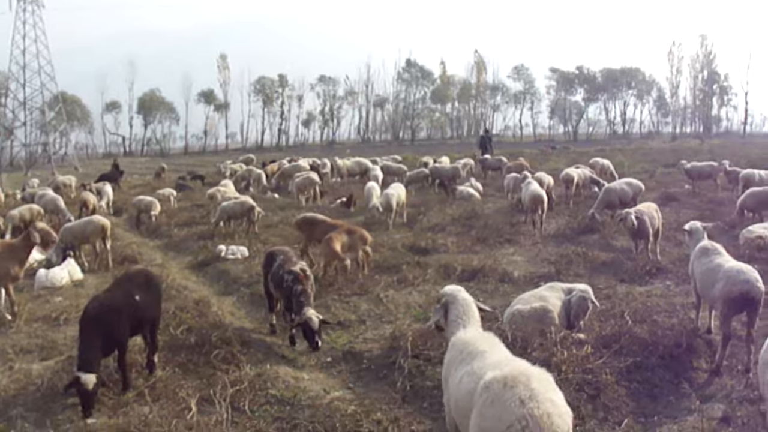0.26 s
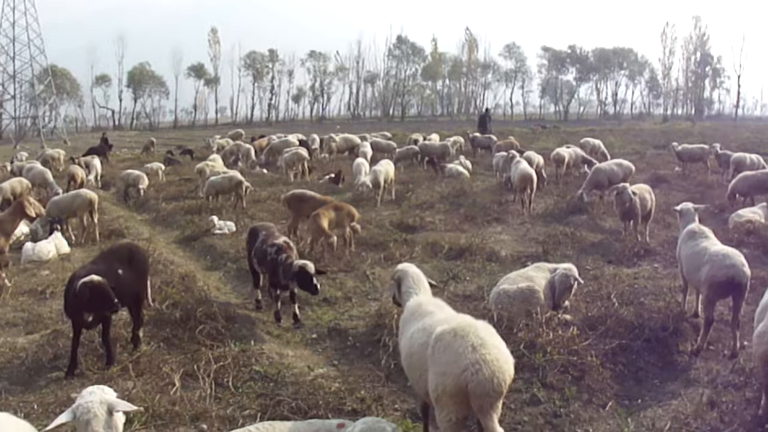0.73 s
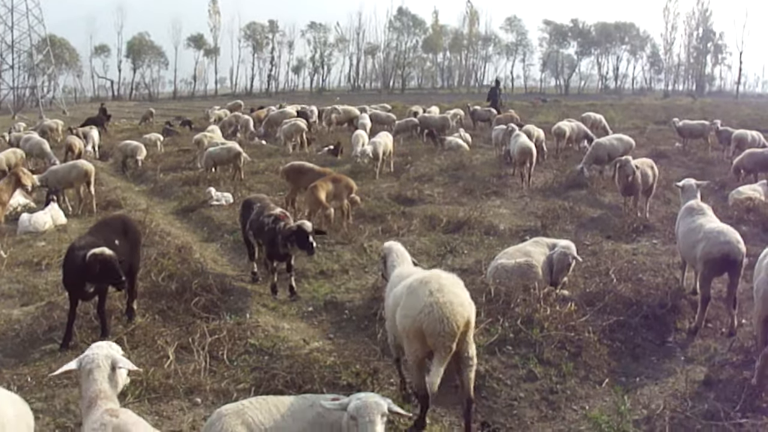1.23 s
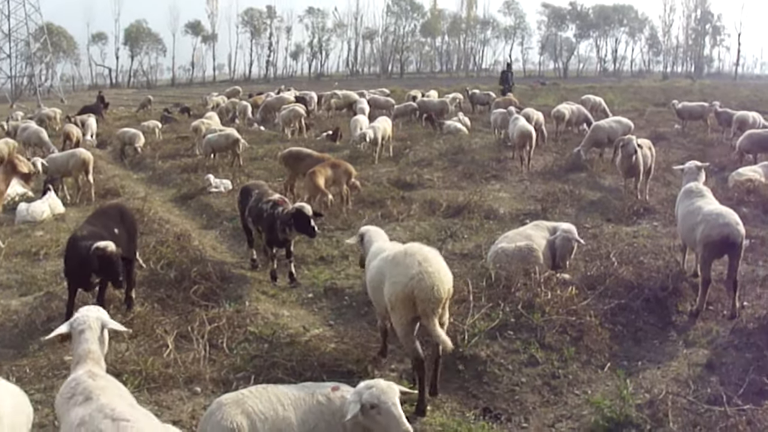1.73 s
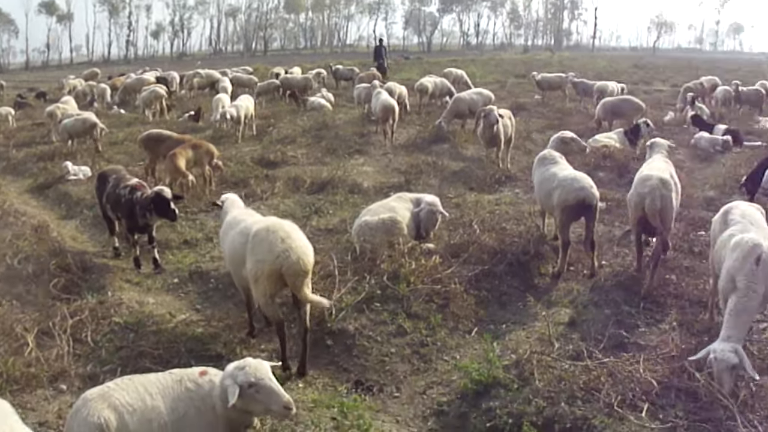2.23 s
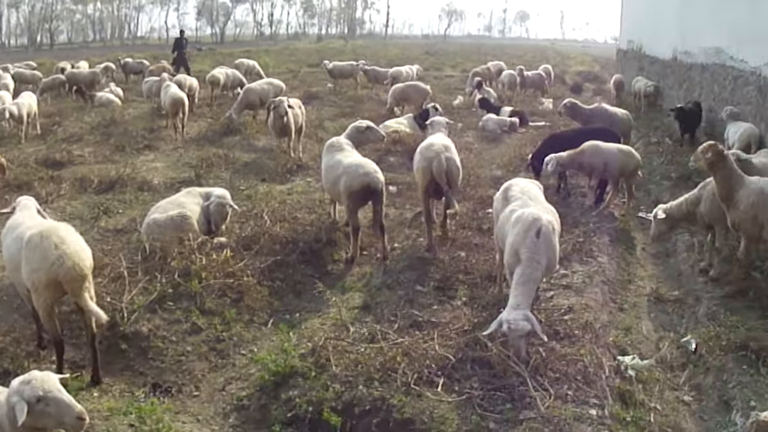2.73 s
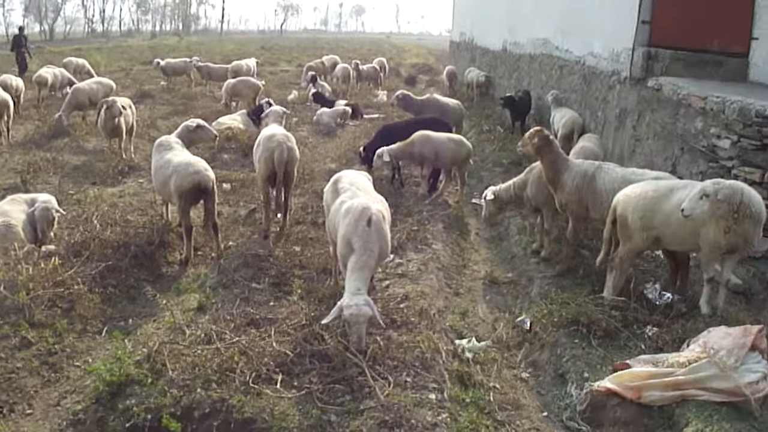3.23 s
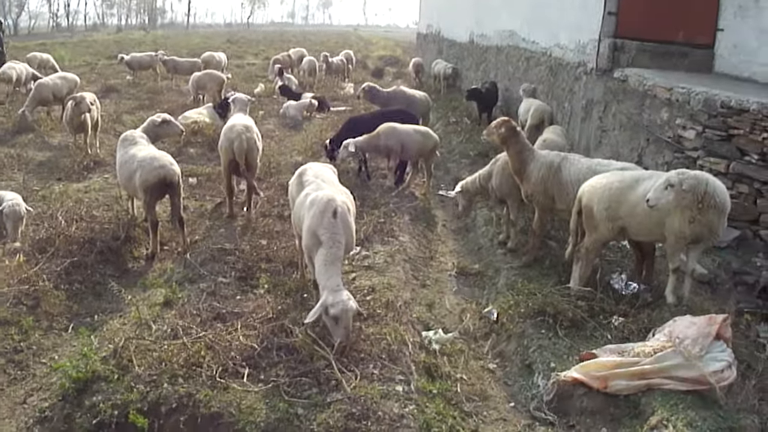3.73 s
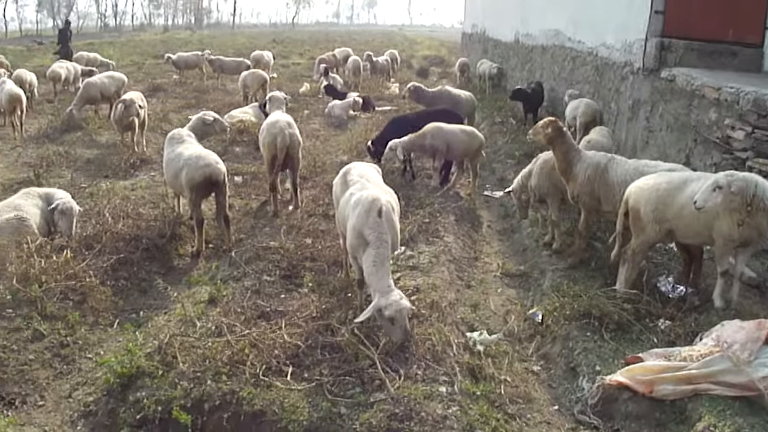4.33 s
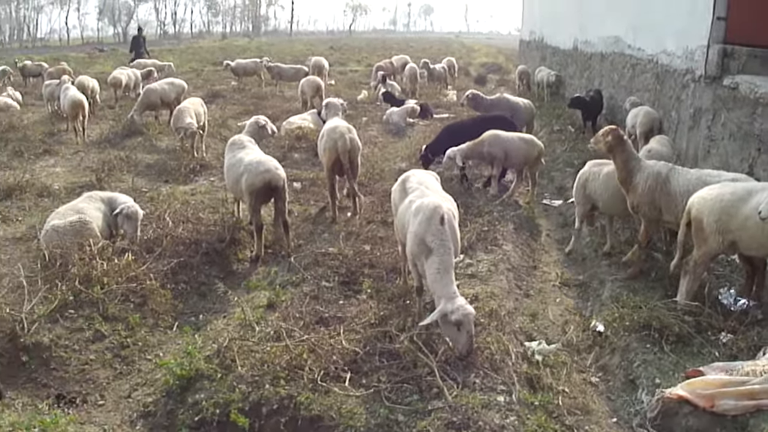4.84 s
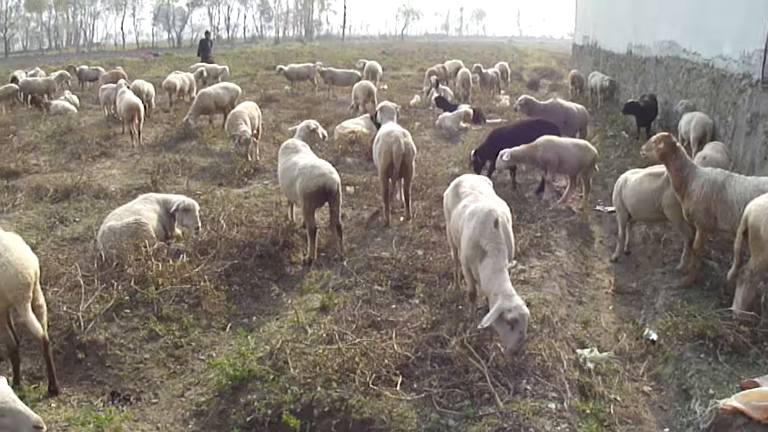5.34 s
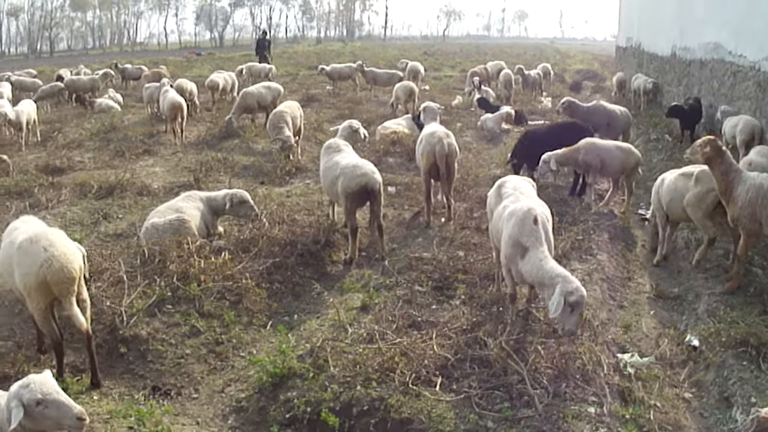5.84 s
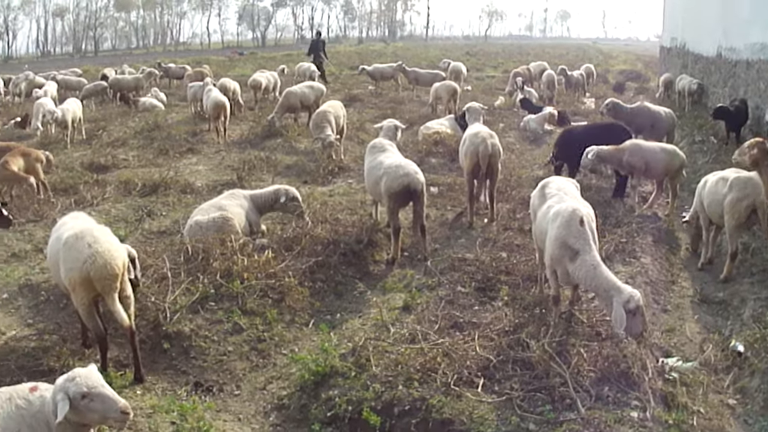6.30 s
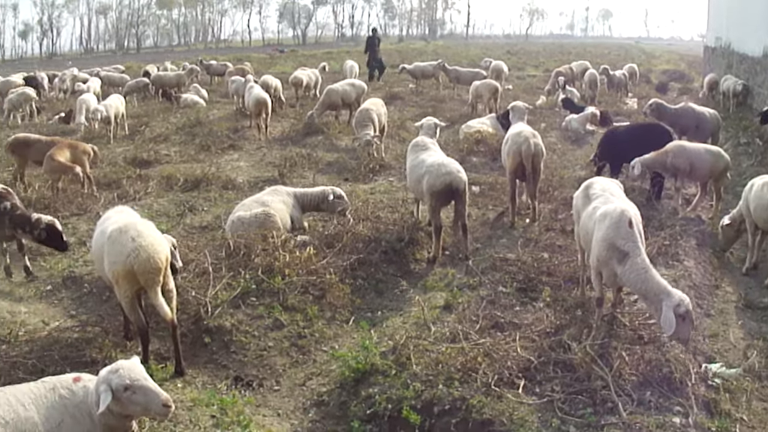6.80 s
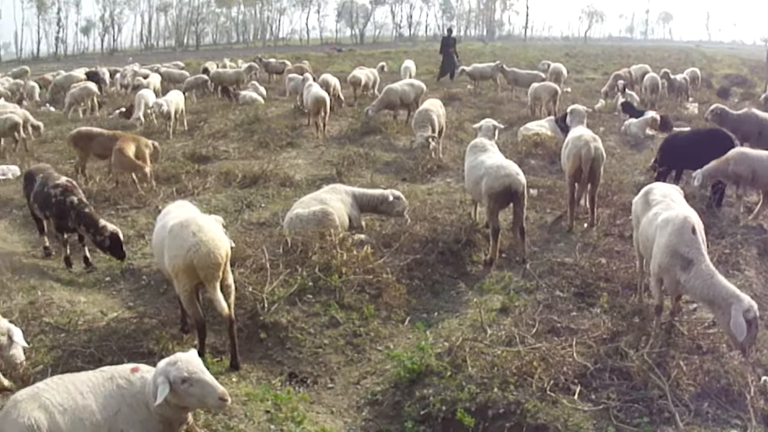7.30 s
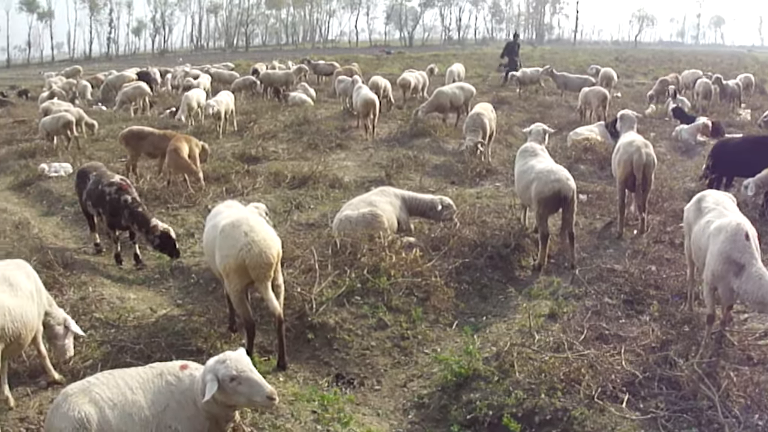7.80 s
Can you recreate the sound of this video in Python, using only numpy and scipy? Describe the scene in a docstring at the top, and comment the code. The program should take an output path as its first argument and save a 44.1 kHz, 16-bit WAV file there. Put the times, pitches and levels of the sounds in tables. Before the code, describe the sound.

Dry stalks rustle and snap in an open field while light wind puffs on the microphone. A sheep bleats loudly nearby, its note breaking into a rasp, and a faint, low bleat follows from far off. After a tiny tinkle of a bell comes a softer, hoarse bleat, then another loud one near the end. A distant engine thuds faintly under an even hush.

```python
"""Dry stalks rustle and snap in an open field; then sheep bleat: three near calls and a far, low one.
Each bleat follows the source-filter principle: closures of the vocal folds ring the vocal tract.
It starts creaky, holds a clean note and, when pushed, breaks into a rasp of uneven closures.
A one-cylinder engine thuds far off, wind puffs on the microphone and a small bell is lightly tapped,
all over the even hush of open country."""
import sys
import numpy as np
from scipy import signal
from scipy.fft import rfft, irfft
from scipy.io import wavfile
from scipy.ndimage import uniform_filter1d, map_coordinates

SR = 44100
rng = np.random.default_rng(int(sys.argv[2]) if len(sys.argv) > 2 else 0)


def int16_out(signal):
    """Quantize to a 16-bit WAV file."""
    q = np.round(np.clip(np.atleast_2d(signal).T, -1, 1) * 32767)
    wavfile.write(sys.argv[1], SR, q.astype(np.int16))


N = 355446
TIME = np.arange(N) / SR

# larynx in the first, far, soft and last bleat: (creak start [s], voice onset [s], pitch leap [s],
# rasp onset [s], release [s], note [Hz], drift [Hz/s], leap time constant [s], overshoot rate [Hz],
# final droop [Hz], creak level [dB], note level [dB], attack [s], sag [dB/s], lift in the rasp [dB],
# roughness of the leap [0-1], roughness of the note [0-1])
VOICES = [(1.345, 1.444, 1.512, 1.95, 2.3515, 182, 20, .046, 0, 2.35, -38, -17, .022, 7.5, 0, .85, .04),
          (2.44, 2.49, 2.4, 2.79, 3.21, 132.9, 0, .041, 0, 2.9, -68, -44, .04, 14, 11, 0, 0),
          (4.42, 4.535, 4.552, 5.535, 5.57, 176.8, -6, .066, 3, 12, -46.5, -28, .03, 1.3, -2, .1, .3),
          (6.6, 6.682, 6.772, 7.275, 7.517, 182.6, 11.5, .049, .5, 1.9, -43, -19, .125, 8, -.5, .4, .25)]
# moving mouth: (time [s], first formant [Hz], second formant [Hz], third formant [Hz],
# height of the first [dB], brightness [dB], treble [dB])
FIRST_MOUTH = [(1.46, 642, 1200.0, 2040, 15, 6.5, -14), (1.53, 640, 1240, 2240, 15, 8, -8),
               (1.6, 727, 1540, 2310, 16, 5.0, -4.5), (1.68, 709, 1380, 2300, 13.5, 0.5, -2.5),
               (1.77, 730, 1384, 2240, 13, 5, -6.5), (1.93, 724, 1370, 2220, 12.5, -6.5, 4.5),
               (2.0, 732, 1390, 2400, 10.5, -11, 3.5), (2.17, 690, 1366, 2460, 11, -9, 2),
               (2.37, 650, 1266, 2700, 13.5, -8, 2.5)]
FAR_MOUTH = [(2.52, 510, 900, 1160, 20, 1.65, 0), (2.76, 435, 840, 1170, 17, 1.8, 0),
             (2.87, 480, 820, 1410, 16.4, -1.9, 0), (3.22, 388, 800, 1530, 17, -1.8, 0)]
SOFT_MOUTH = [(4.57, 456.0, 1265, 1724.0, 18, -4, 1), (4.66, 503.0, 1286, 1740, 9.2, 0, -2),
              (4.77, 540.0, 1280, 1770, 8.3, -6.5, 4), (4.92, 551.0, 1300, 1710, 13.4, 7, -8),
              (5.05, 600, 1410, 1880, 5.7, -4.5, -2), (5.2, 600, 1414, 1750, 15.7, 6, -8),
              (5.35, 560, 1276, 1810, 7.7, -10.5, 3), (5.48, 560, 1294, 1850, 10.4, -2, -1),
              (5.57, 553, 1250, 1940, 32, 2, -3)]
LAST_MOUTH = [(6.66, 446, 1080, 2170, 7, -3, 9), (6.74, 493, 1210, 2240, 15, 4, -3),
              (6.79, 596, 1290, 2240, 26.5, 9, -8), (6.85, 714, 1720, 2270, 15.5, 9, -4),
              (6.9, 840, 1860, 2240, 11, 10, -3.5), (6.971, 842.0, 2206, 2354, 18.5, 4.5, 4),
              (7.1, 766, 2260, 2590, 8.5, 4, 2.5), (7.26, 745, 2370, 2520, 9.5, 0.5, 1.5),
              (7.31, 663, 2300, 2600, 21.5, -5, 3.5), (7.42, 650, 2420, 2660, 20.5, 1, 0.5),
              (7.53, 650, 2460, 2800, 21.5, -5.5, 5)]
# formant shapes: (first width [Hz], second width [Hz], third width [Hz],
# second height [dB], third height [dB])
FIRST_FORMANTS = (83, 235, 470, 13.4, 14.6)
FAR_FORMANTS = (195, 390, 440, 10.2, 21)
SOFT_FORMANTS = (250, 124, 440, 15.2, 16.1)
LAST_FORMANTS = (164, 61, 360, 7.7, 13.2)
# steady response of throat and path: (frequency [Hz], gain [dB])
FIRST_THROAT = [(180.0, -32.4), (295.0, -10), (370.0, -3.8), (650.0, 1.3), (980.0, -11.1), (1400.0, -5.6),
                (2000.0, -7.8), (2600.0, -14.2), (3050.0, -18.7), (3600.0, -20.1), (4600.0, -21.4),
                (6000.0, -34.4), (7200.0, -40.3), (10000.0, -54.3)]
FAR_THROAT = [(130, -34), (300, 4.5), (500, 8), (900, 4), (1250, -7.5), (1700, -35), (3000, -42)]
SOFT_THROAT = [(170.0, -22), (350.0, -16.5), (520.0, 0), (850.0, -5), (1100.0, 1.5), (1550.0, -9),
               (1900.0, -1.5), (2650.0, -5.5), (3250.0, -23.5), (4000.0, -27), (5500.0, -32.5),
               (9000.0, -47.5)]
LAST_THROAT = [(180.0, -18), (295.0, -18), (370.0, 1.5), (650.0, -8.5), (950.0, -4), (1350.0, 5),
               (1750.0, -5), (2500.0, -6.5), (3050.0, -16.5), (3600.0, -24.5), (4600.0, -28.5),
               (5700.0, -39), (7000.0, -48), (10000.0, -62.5)]
# resonances and antiresonances of head and nose: (frequency [Hz], width [Hz], height [dB])
FIRST_NASAL = [(3030, 57, -11.5), (3500, 220, 5.5), (4080, 110, 12.5), (4240, 170, -19.5), (4590, 120, 9),
               (4880, 300, -9), (6360, 1400, 4), (8000, 502, 3)]
SOFT_NASAL = [(4070, 220, 9.4), (5160, 230, 8.4), (6640, 397.0, 6.0)]
LAST_NASAL = [(2860, 114, -10.5), (3460, 400, 4.5), (4050, 140, 9), (4170, 160, -10.5), (5370, 190, -19),
              (5590, 360, 14.5), (7000, 1800, 7)]
# stalks that snap: (time [s], peak level [dB], pitch [Hz])
STALK_SNAPS = [(.571, -26, 4500), (.728, -34.5, 4730), (.838, -36, 3500), (.887, -43, 6000),
               (1.343, -33, 1700), (1.391, -24.5, 1970), (1.423, -27, 2600), (2.87, -42, 6000),
               (3.247, -34, 6000), (3.66, -41, 1000), (6.678, -26, 1990)]
# hooves pressing into straw: (time [s], peak level [dB], length [s])
HOOF_STEPS = [(.24, -57, 0.028), (.39, -56.5, 0.054), (.7, -57, 0.18), (1.29, -53, 0.18),
              (3.28, -58, 0.052)]
# gusts on the microphone: (time [s], peak level [dB], length [s])
GUSTS = [(.67, -51, 0.03), (.715, -33.5, 0.01), (.77, -36, 0.0088), (.807, -41, 0.018), (.866, -41, 0.03),
         (.935, -47, 0.046), (1.135, -36.5, 0.047), (1.28, -34.5, 0.017), (1.335, -33.5, 0.009),
         (1.42, -41.5, 0.21), (5.455, -38, 0.042), (5.507, -30, 0.02), (5.535, -29.5, 0.015),
         (6.211, -43.5, 0.036), (6.448, -44, 0.017), (6.7, -48, 0.051), (8.03, -46.5, 0.066)]
# engine clatter while the microphone faces a house wall: (time [s], peak level [dB], length [s])
WALL_CLATTER = [(3.8, -59.5, 1.2)]
# engine hum as the microphone turns: (time [s], level [dB])
HUM_LEVEL = [(0, -59), (2.2, -61), (3.3, -59.5), (5, -57.5), (6.6, -53.5), (8, -59)]
# taps on the bell: (time [s], level [dB])
BELL_TAPS = [(4.435, -56), (4.535, -50), (4.615, -57)]
# modes of the bell: (frequency [Hz], relative level [dB], time to fall 60 dB [s])
BELL_MODES = [(3600, 4.5, .17), (8800, -10.5, 0.23)]
# spectra of the noise sources: (frequency [Hz], relative level [dB])
STRAW_SPECTRUM = [(300, -23.5), (900, 5.5), (2000, -6.5), (4500, -2), (7000, -10), (11000, -23)]
WIND_SPECTRUM = [(25, -31), (60, -12), (130, 0), (230, -.5), (380, -8.5), (600, -21), (1500, -42),
                 (6000, -75)]
EXHAUST_SPECTRUM = [(70, -46.5), (150, 1), (260, 1.5), (400, 7.5), (550, 3.5), (700, -6), (1500, -36.5)]
CLATTER_SPECTRUM = [(500, -27.5), (1600, -14.5), (1950, 6), (2300, -12.5), (3000, -5), (3500, -6),
                    (4000, -16), (10000, -28.5)]
FIELD_SPECTRUM = [(30, -31.5), (60, -21), (140, -9.5), (200, -13.5), (260, -6), (500, -10.5), (720, -12.5),
                  (1200, -14.5), (1930, -16), (2400, -19), (3300, -21.5), (5000, -27), (9600, -36),
                  (11000, -43)]

LOW_SHARE, LOW_CLIMB_HZ_PER_S, LOW_DB = .8, 100, -3  # low register, relative to the held note
CREAK_ROUGH, CLEAR_S, HOARSE_S = 1, .02, .45  # the creak clears fast, hoarseness fades slowly
CRACK_DELAY_S, CRACK_S = .0063, .012  # the voice cracks in the leap
RASP_ROUGH, RASP_BUILD_S, RASP_STEP_HZ, RASP_FALL_HZ_PER_S = 1.15, .022, 4.5, 14
DROOP_S, RELEASE_HZ_PER_S, RELEASE_DB_PER_S, RELEASE_S = .09, 400, 445, .12  # the air runs out
RUSH, RUSH_S = 1.3, .025  # extra air through the open folds before they meet
RIPPLE_DB, WAVER_DB, RIPPLE_HZ, RIPPLE_S = 2, 1.5, 240, .11  # treble and full-band depth, spacing, life
LINGER_HZ, LINGER_WIDTH_HZ = 1900, 900  # band that is delayed slightly, softening each pulse


def flock():
    """Four bleats add by superposition, each with its own larynx and vocal tract."""
    first_voice, far_voice, soft_voice, last_voice = VOICES
    first = bleat(first_voice, (FIRST_MOUTH, FIRST_FORMANTS, FIRST_THROAT, FIRST_NASAL),
                  climb=.05, climb_s=.2, flutter_hz=38.5, burst_db=2.3, limp_db=2.5,
                  jitter_s=.000045, slap=.42, air=.2, leak=0)
    far = bleat(far_voice, (FAR_MOUTH, FAR_FORMANTS, FAR_THROAT, []),
                climb=0, climb_s=1, flutter_hz=28, burst_db=3, limp_db=2,
                jitter_s=.0005, slap=.6, air=.8, leak=0)
    soft = bleat(soft_voice, (SOFT_MOUTH, SOFT_FORMANTS, SOFT_THROAT, SOFT_NASAL),
                 climb=-.028, climb_s=.39, flutter_hz=34.1, burst_db=3, limp_db=-1.5,
                 jitter_s=.00007, slap=.4, air=.6, leak=.6)
    last = bleat(last_voice, (LAST_MOUTH, LAST_FORMANTS, LAST_THROAT, LAST_NASAL),
                 climb=.13, climb_s=.11, flutter_hz=42, burst_db=2.7, limp_db=3,
                 jitter_s=.00006, slap=.5, air=.25, leak=0)
    return first + far + soft + last


def bleat(voice, anatomy, climb, climb_s, flutter_hz, burst_db, limp_db, jitter_s, slap, air, leak,
          size=1024):
    """Source and filter: each fold closure rings the tract; roughness scales jitter and shimmer."""
    t, pitch, gain, roughness = larynx(voice)
    at = cycle_ends(pitch * (1 + .0008 * walk(30)[:len(t)]))
    count = len(at)
    rough = np.interp(at, np.arange(len(t)), np.maximum(roughness, 0)) ** 1.4
    rate_noise, rasp_shimmer, shimmer, jitter = rng.standard_normal((256, 4))[:count].T
    # a slower flutter of the tissue strengthens about every fifth closure
    flutter_phase = np.cumsum(flutter_hz * np.gradient(at) / SR * (1 + .24 * rate_noise)) % 1
    flutter_db = burst_db * (np.exp(-flutter_phase / .25) - .25)
    # period doubling: strong and weak closures alternate, adding lines between the overtones
    alternate_db = limp_db * (-1) ** np.arange(count)
    strength = undb(rough * (1.9 * rasp_shimmer + flutter_db + alternate_db) + .3 * shimmer)[:, None]
    at = np.maximum(at + rough * jitter_s * SR * jitter, 0)
    times = t[0] + at / SR
    hz = np.fft.rfftfreq(size, 1 / SR)
    delay = lambda samples: np.exp(-2j * np.pi * hz * samples[:, None] / SR)
    # strained folds slap together once more within the cycle
    slap_lag = rng.uniform(.15, .85, 256)[:count] * SR / np.mean(pitch)
    closures = delay(at % 1) * (strength + slap * rough[:, None] * delay(slap_lag))
    # turbulent air follows each closure
    puff = rng.standard_normal((256, size))[:count] * np.exp(-np.arange(size) / SR / .004)
    puff /= np.linalg.norm(puff, axis=1, keepdims=True)
    rush = RUSH * np.exp(-np.maximum(times - voice[1], 0) / RUSH_S)
    turbulence = ((air + rush) * rough)[:, None] + .045 * (1 + (hz / 2600) ** 2)
    response = vocal_tract(*anatomy, climb, climb_s, times, leak * np.minimum(rough, 1), hz)
    rings = irfft((closures + turbulence * rfft(puff)) * response)
    call = np.zeros(len(t) + 2 * size)
    for start, ring in zip(at.astype(int), rings):
        call[start:start + size] += ring
    call = call[:len(t)]
    power = uniform_filter1d(uniform_filter1d(call ** 2, size=1300), size=900)
    call = call / np.sqrt(power + 1e-12) * gain  # the larynx alone sets the level
    return np.pad(call, (int(t[0] * SR), N))[:N]


def larynx(voice):
    """Fold tension sets the pitch: a creak opens into a low voice, leaps to a note, rasps and dies."""
    start, opens, leap, rasp, release, note_hz, drift, leap_s, swing_hz, droop_hz = voice[:10]
    creak_db, note_db, attack_s, sag, lift_db, crack, hoarse = voice[10:]
    t = np.arange(start, release + RELEASE_S, 1 / SR)
    since = lambda s: np.maximum(t - s, 0)
    # the folds tighten like a damped spring: 1 in the low register, 0 on the note
    low = np.exp(-since(leap) / leap_s) * np.cos(2 * np.pi * swing_hz * since(leap))
    strain = 1 - np.exp(-since(rasp) / RASP_BUILD_S)
    pitch = note_hz * (1 - (1 - LOW_SHARE) * low) - LOW_CLIMB_HZ_PER_S * np.maximum(leap - t, 0)
    pitch += drift * (since(leap) - since(rasp))
    pitch += RASP_STEP_HZ * strain - RASP_FALL_HZ_PER_S * since(rasp)
    pitch -= droop_hz * np.exp(np.minimum(t - release, 0) / DROOP_S) + RELEASE_HZ_PER_S * since(release)
    pitch *= 1 + .0015 * walk(12)[:len(t)]  # slight wobble
    held_db = note_db + LOW_DB * low - sag * since(leap) + lift_db * strain
    held_db -= RELEASE_DB_PER_S * since(release)
    attack = np.minimum(since(opens) / attack_s, 1)
    creak = np.sin(np.pi * np.minimum(since(start) / (opens + attack_s - start), 1))
    gain = undb(held_db) * attack ** 1.03 + undb(creak_db) * creak
    hoarse = hoarse * np.exp(-since(opens) / HOARSE_S)
    creak_left = np.exp(-since(opens) / (CLEAR_S + attack_s / 3))
    roughness = hoarse + (CREAK_ROUGH - hoarse) * creak_left + (RASP_ROUGH - hoarse) * strain
    roughness += crack * np.exp(-((t - leap - CRACK_DELAY_S) / CRACK_S) ** 2)
    return t, pitch, gain, roughness


def vocal_tract(mouth, formants, throat, nasal, climb, climb_s, times, leak, hz):
    """Cavity resonance: three formants move, and the upper resonances glide as the mouth opens."""
    *centres, first_db, bright_db, treble_db = (c[:, None] for c in curves(mouth, times))
    widths, heights = formants[:3], (first_db, *formants[3:])
    sway = 1 + .008 * np.interp(times, TIME, walk(7))[:, None]  # the jaw is never quite still
    stretch = sway * (1 - climb * np.exp(-np.maximum(times - mouth[0][0], 0) / climb_s))[:, None]
    db = spectrum_db(throat, hz) + bright_db * hz ** 4 / (hz ** 4 + 1900. ** 4)
    # small side cavities leave fine peaks and dips that glide too, and come and go
    place = np.broadcast_arrays((times - times[0])[:, None] / RIPPLE_S, hz / stretch / RIPPLE_HZ)
    ripple = map_coordinates(rng.standard_normal((16, 128)), place, mode="mirror")
    treble_shelf = hz ** 8 / (hz ** 8 + 3200. ** 8)
    db = db + (treble_db + RIPPLE_DB * ripple) * treble_shelf + WAVER_DB * ripple
    lower = [(centre * sway, width, height) for centre, width, height in zip(centres, widths, heights)]
    upper = [(centre * stretch, width, height) for centre, width, height in nasal]
    seal = 1 - leak[:, None]  # rough folds never quite close, which damps the resonances
    for centre, width, height in lower + upper:
        db = db + seal * height / (1 + (2 * (hz - centre) / width) ** 2)
    pole = LINGER_HZ ** 2 - hz ** 2 + 1j * hz * LINGER_WIDTH_HZ
    smear_allpass = np.conj(pole) / pole
    radiation = (1j * hz / (1j * hz + 70)) ** 2  # a small mouth radiates little bass
    return minimum_phase(db) * smear_allpass * radiation


def outdoors(x, scatter_db, decay_s, size=12000):
    """Scattering from ground, animals and a wall adds a faint, short tail."""
    t = np.arange(size) / SR
    tail = rng.standard_normal(size) * np.exp(-t / decay_s) * (1 - np.exp(-t / .007))
    return x + undb(scatter_db) * signal.fftconvolve(x, tail / np.linalg.norm(tail))[:N]


def straw(rustle_db, settle_db_per_s, grains_per_s, spread_db, snap_s, size=1500):
    """Brittle fracture: stalks crackle under hooves, less as the flock settles; a few snap."""
    grains = (rng.random(N) < grains_per_s / SR) * rng.standard_normal(N)
    grains *= undb(spread_db * np.minimum(rng.exponential(size=N), 5))
    envelope = undb(rustle_db - settle_db_per_s * TIME) + swells(HOOF_STEPS)
    out = coloured(grains, STRAW_SPECTRUM) * envelope
    for s, db, hz in STALK_SNAPS:
        burst = rng.standard_normal(size) * np.exp(-np.arange(size) / SR / snap_s)
        band = signal.butter(2, [hz * .65, hz * 1.31], "band", fs=SR)
        snap = signal.lfilter(*band, burst) + .024 * burst
        out[int(s * SR):int(s * SR) + size] += undb(db) * snap / np.abs(snap).max()
    return out


def wind(breeze_db, eddies_per_s, eddy_db):
    """Turbulent pressure: a faint breeze and gusts buffet the microphone, broken up by eddies."""
    flow = undb(breeze_db + 2 * eddy_db * walk(5)) + swells(GUSTS)
    eddies = undb(eddy_db * walk(eddies_per_s))
    return flow * eddies * coloured(rng.standard_normal(N), WIND_SPECTRUM)


def engine(firing_hz, thud_db, thud_s, rebound, clatter_db, hum_hz):
    """Periodic combustion: a thud and clatter per firing, a weaker thud between, and a wavering hum."""
    phase = np.cumsum(firing_hz * (1 + .012 * walk(3))) / SR
    firing, between = (np.exp(-((phase + shift) % 1) / firing_hz / thud_s) for shift in (0, .5))
    thuds = coloured((firing + rebound * between) * rng.standard_normal(N), EXHAUST_SPECTRUM)
    clatter = coloured(firing ** .73 * rng.standard_normal(N), CLATTER_SPECTRUM)
    clatter *= undb(clatter_db) + swells(WALL_CLATTER)
    hum_phase = 2 * np.pi * np.cumsum(hum_hz * (1 + .0076 * walk(6.5))) / SR
    hum = unit(np.sin(hum_phase) * undb(walk(3.9)))
    return undb(thud_db) * thuds + clatter + undb(curves(HUM_LEVEL, TIME)[0]) * hum


def bell(size=12000):
    """Modal vibration: light taps ring two damped modes of a small bell on a moving animal."""
    t, out = np.arange(size) / SR, np.zeros(N)
    ring = sum(undb(db - 60 * t / t60) * np.sin(2 * np.pi * hz * t) for hz, db, t60 in BELL_MODES)
    for s, db in BELL_TAPS:
        out[int(s * SR):int(s * SR) + size] += undb(db) * ring
    return out


def field(level_db):
    """Nearly stationary broadband noise: the even hush of open country."""
    return undb(level_db + .5 * walk(3.3)) * coloured(rng.standard_normal(N), FIELD_SPECTRUM)


def undb(db):
    """Decibels to amplitude ratio."""
    return 10 ** (np.asarray(db) / 20)


def unit(x):
    """Normalisation to rms 1."""
    return x / np.sqrt(np.mean(x ** 2))


def curves(table, t):
    """Linear interpolation of a table's columns at the times t."""
    s, *columns = np.transpose(table)
    return [np.interp(t, s, c) for c in columns]


def swells(table):
    """A sum of Gaussian envelopes, one per event."""
    return sum(undb(db) * np.exp(-2 * ((TIME - s) / length) ** 2) for s, db, length in table)


def walk(rate):
    """Slow random modulation of rms 1, with `rate` new values a second."""
    k = int(SR / rate)
    return unit(uniform_filter1d(np.repeat(rng.standard_normal(N // k + 1), k), k)[:N])


def cycle_ends(hz):
    """Phase is the integral of frequency: fractional sample positions at which cycles end."""
    phase = np.cumsum(hz) / SR
    return np.interp(np.arange(1, int(phase[-1])), phase, np.arange(len(hz)))


def spectrum_db(points, hz):
    """Interpolation of a spectrum on a log-frequency axis."""
    f, db = np.transpose(points)
    return np.interp(np.log(np.maximum(hz, 1)), np.log(f), db)


def minimum_phase(db):
    """Causality: folding the cepstrum gives the minimum-phase response with these gains."""
    cepstrum = irfft(np.log(undb(db)))
    half = cepstrum.shape[-1] // 2
    cepstrum[..., 1:half] *= 2
    cepstrum[..., half + 1:] = 0
    return np.exp(rfft(cepstrum))


def coloured(x, points, size=4096):
    """Convolution shapes x by a spectrum; the result has rms 1."""
    response = irfft(minimum_phase(spectrum_db(points, np.fft.rfftfreq(size, 1 / SR))))
    return unit(signal.fftconvolve(x, response)[:N])


def scene():
    """Superposition of the flock and the sounds of the field, in one channel."""
    sheep = outdoors(flock(), scatter_db=-10, decay_s=.018)
    motor = engine(firing_hz=18.55, thud_db=-52, thud_s=.015, rebound=.36, clatter_db=-66.5, hum_hz=242)
    stalks = straw(rustle_db=-59, settle_db_per_s=1, grains_per_s=1500, spread_db=3.1, snap_s=.003)
    air = wind(breeze_db=-65, eddies_per_s=45, eddy_db=.5)
    return (sheep + stalks + air + motor + bell() + field(level_db=-49.5))[None]


def record(dry):
    """Band limiting: a steep elliptic low-pass cuts the treble above 11 kHz."""
    return signal.sosfilt(signal.ellip(10, .2, 70, 11000, fs=SR, output="sos"), dry)


dry = scene()
out = record(dry)
int16_out(out)
```